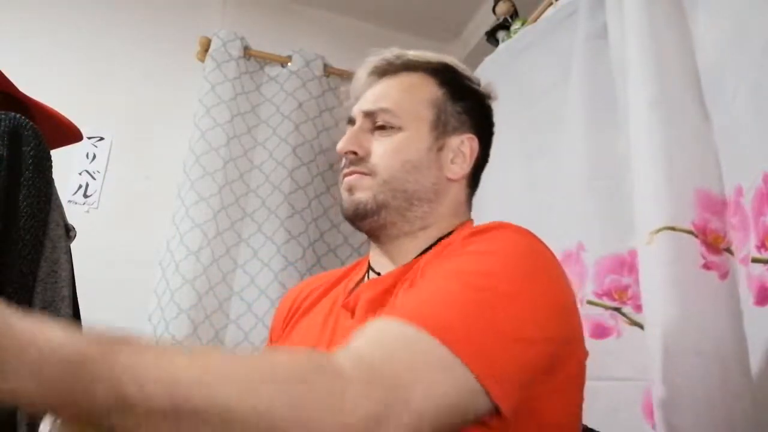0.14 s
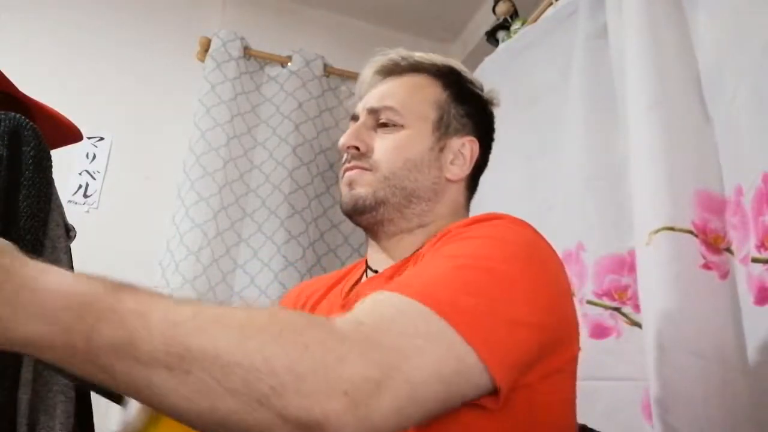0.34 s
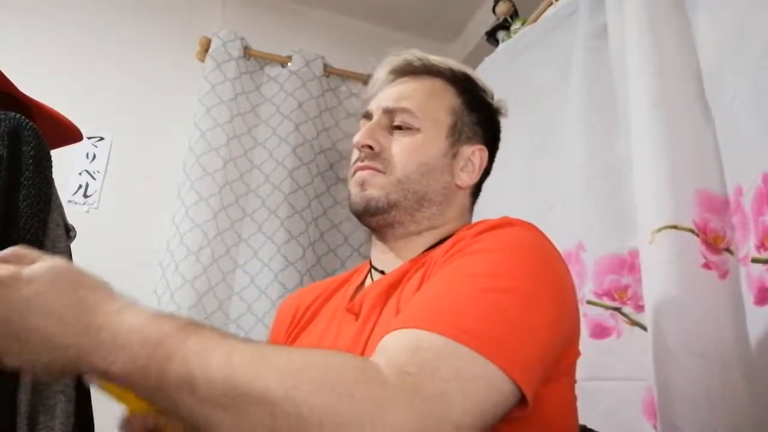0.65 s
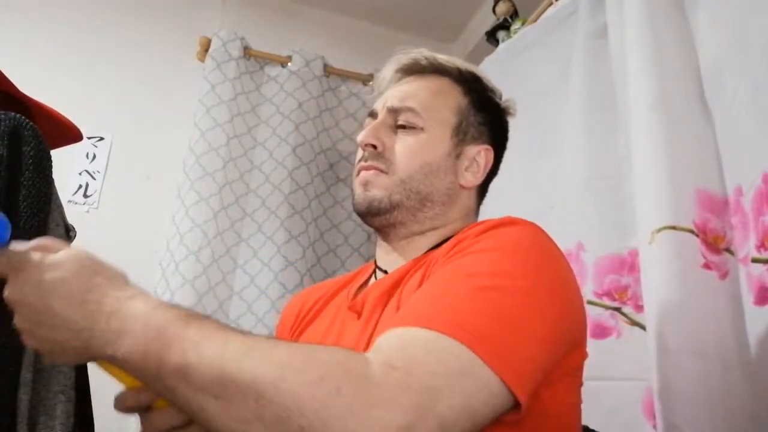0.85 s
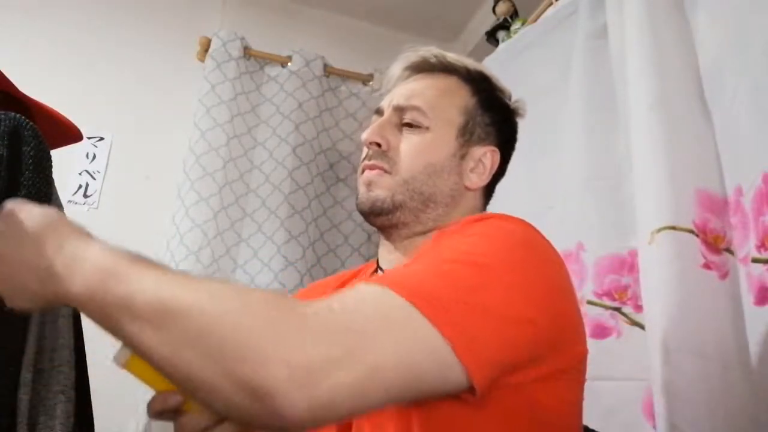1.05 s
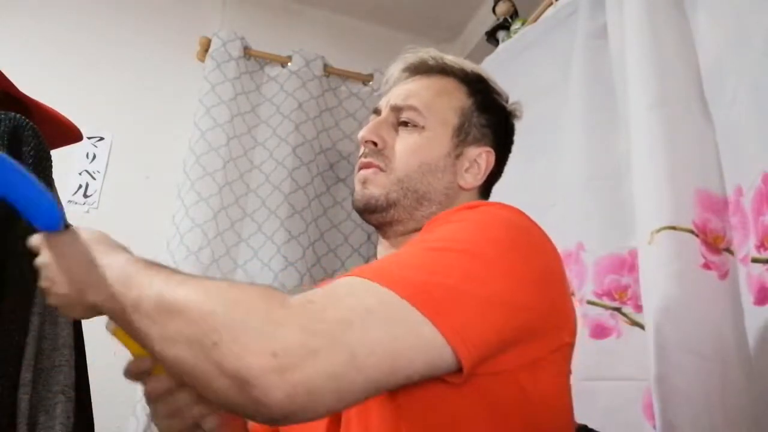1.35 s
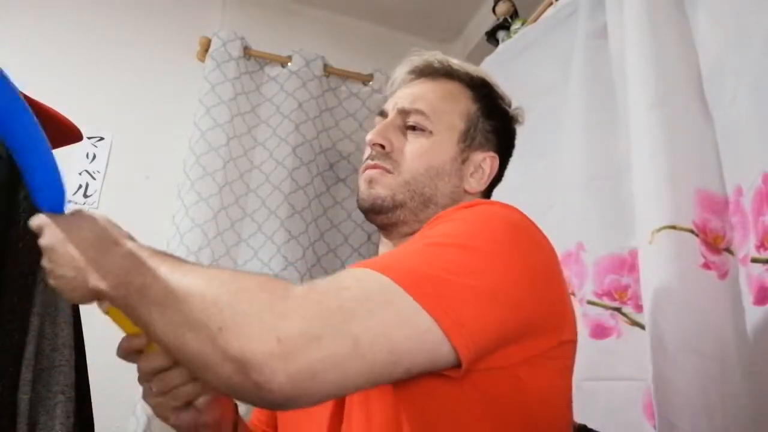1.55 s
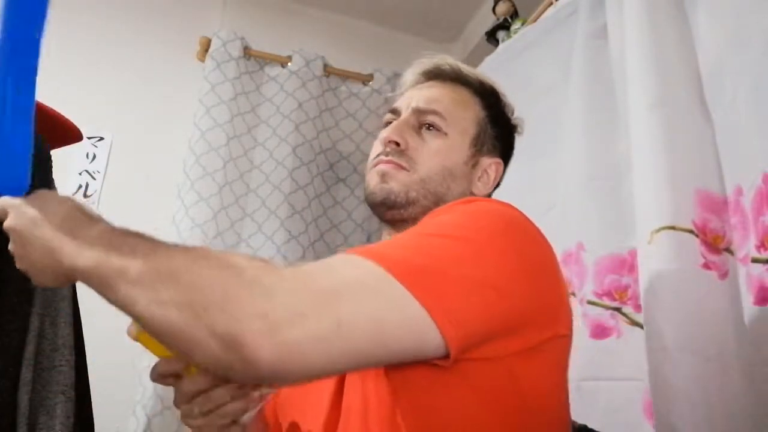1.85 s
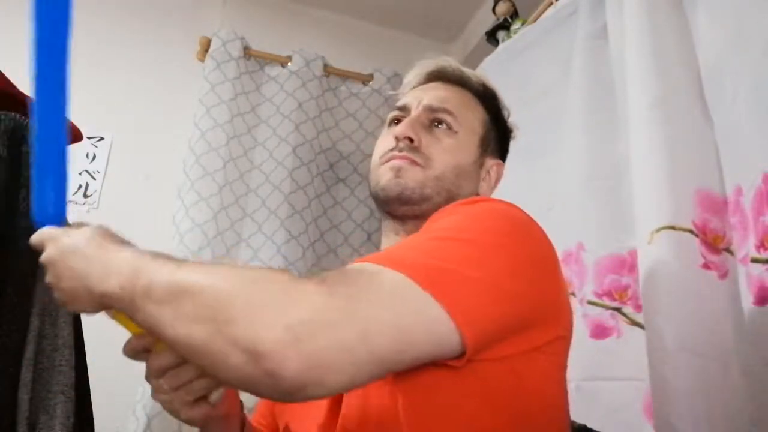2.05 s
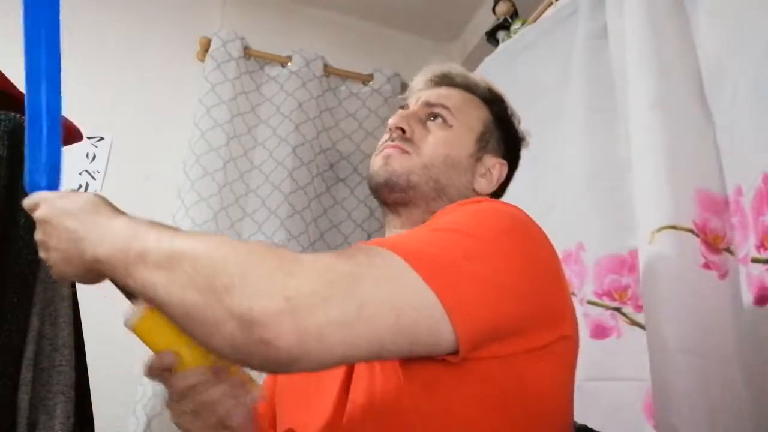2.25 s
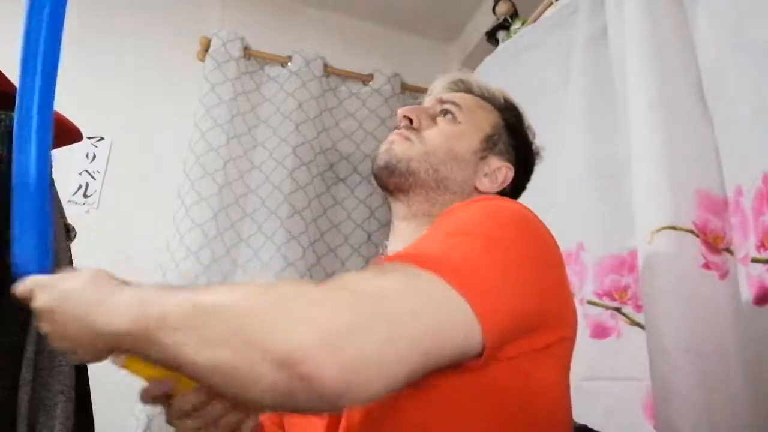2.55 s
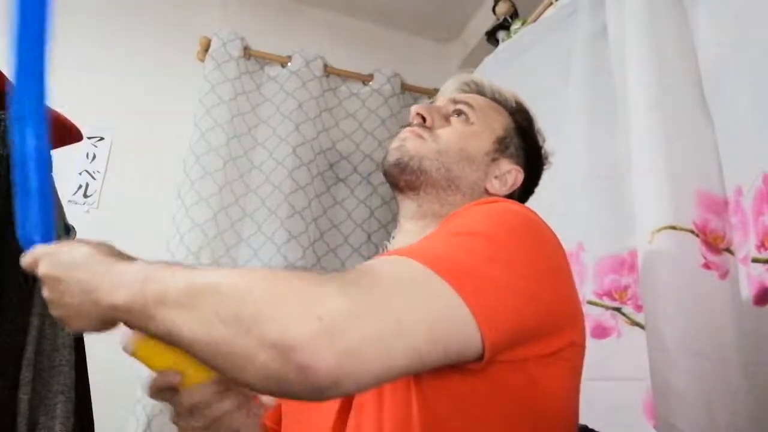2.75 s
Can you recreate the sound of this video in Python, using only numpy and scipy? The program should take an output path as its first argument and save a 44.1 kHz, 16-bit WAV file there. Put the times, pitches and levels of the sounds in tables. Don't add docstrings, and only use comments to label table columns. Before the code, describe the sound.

A plastic hand pump blows air into a long balloon in a small room, close to the microphone: a fluttering squeaky first push, strong hissing strokes, then fainter whistling ones, with hollow knocks between.

```python
import sys
import numpy as np
from scipy import signal
from scipy.io import wavfile
from scipy.ndimage import uniform_filter1d

SR = 44100
rng = np.random.default_rng(int(sys.argv[2]) if len(sys.argv) > 2 else 0)


def log_audio(samples):
    frames = np.atleast_2d(samples).T
    limited = np.clip(frames, -1, 1)
    pcm = np.round(limited * 32767).astype(np.int16)
    wavfile.write(sys.argv[1], SR, pcm)


def field_ratio(decibels):
    return 10 ** (np.asarray(decibels, dtype=float) / 20)


N = 127890
MONO_HZ = 300

# start_s, ease_off_s, end_s, flow_db, jet_hz
PUSHES = [
    (.212, .33, 0.36, -21.5, 6000),
    (.47, .72, 0.87, -22, 7250),
    (.985, 1.12, 1.201, -24.5, 7600),
    (1.275, 1.45, 1.569, -25.5, 9250),
    (1.65, 1.76, 1.863, -29.5, 5300),
    (1.945, 2.085, 2.136, -35, 5700),
    (2.265, 2.35, 2.43, -38.5, 5480),
    (2.51, 2.635, 2.693, -36, 6300),
    (2.805, 2.885, 3.02, -37, 5700),
]
# low_pitch_share, upper_pitch_share, whistle_db, bend_share
PUSH_VOICES = [(1, 1, -1, .05), (1, 1, -1, .05), (1, .98, -1, .05), (1, .98, -1, .05), (1, 1.025, -4, .07),
               (1.008, 1.005, 0, .075), (.995, .995, -1.5, .12), (.998, 1.005, -2, .06), (1, .98, -5, .09)]
# start_s, length_s, flow_db, jet_hz, whistle_db
PULLS = [(0.04, 0.037, -92, 1500, -10), (0.052, 0.13, -44.5, 1560, -3), (0.094, 0.36, -50, 2200, -14.5),
         (0.378, 0.106, -28.5, 5970, -3), (0.894, 0.16, -34, 7460, -1), (1.194, 0.11, -37, 8600, -11),
         (1.571, 0.21, -41.5, 5320, 3), (1.85, 0.088, -45, 5370, -19), (2.191, 0.09, -45.5, 5200, -0.5),
         (2.434, 0.22, -58.5, 5200, -5), (2.72, 0.091, -44.5, 5170, -4)]
# time_s, fill_share, fizz_db
FILL = [(.2, 0.39, -1.5), (.5, 0.12, 2), (.95, 0.37, 4), (1.3, 0.32, -1.5), (1.65, 0.7, 6.5),
        (1.95, 0.92, 3.5), (2.9, 0.95, -1.5)]
# freq_hz, level_db_per_hz
SLACK_NECK = [(180, -15.5), (300, -33), (731, -24), (1620, -15), (1970, -7), (3070, -7), (4720, -6),
              (11300, -6), (15500, -16.5)]
# freq_hz, level_db_per_hz
TIGHT_NECK = [(180, -77), (300, -33.5), (1200, -24), (1700, -10.5), (3000, -8), (3800, -13.5), (11700, -20),
              (15500, -30.5)]
# freq_hz, width_hz, level_db
BARREL = [(1600, 30, -2), (3000, 50, -2.5), (4480, 60, -9), (5950, 100, -10)]
# centre_s, pitch_hz, level_db, length_s
SQUEAKS = [
    (.222, 3002, -24.5, 0.015),
    (0.24, 3050, -26.5, .024),
    (.254, 3216, -27, .014),
    (.267, 3126, -23, 0.013),
    (0.285, 3270, -27, 0.016),
    (0.294, 3054, -27.5, .02),
    (0.307, 2896, -27, 0.0092),
    (0.324, 2583, -24, .022),
    (0.342, 2180, -20.5, 0.018),
]
# start_s, peak_db, thud_hz, click_db, click_hz
KNOCKS = [(0.056, -32, 420, 3.5, 1360), (0.208, -20, 156, -17, 513), (0.354, -45.5, 127, 11, 1500),
          (0.709, -22.5, 357.2, -27, 990), (.772, -25, 372, -21, 858), (0.801, -37.5, 300, 0, 1500),
          (.94, -40, 393, 0.5, 1458), (1.198, -41, 260.5, -23, 1030), (1.262, -33, 223, -33, 1000),
          (1.487, -40.5, 243, -31, 1010), (1.569, -56.5, 402, 21, 1500), (1.917, -33.5, 225, -39, 1020),
          (2.08, -31, 230, 10, 3740), (2.215, -16, 388, -14.5, 1730), (2.488, -31, 225, -33, 1020),
          (2.623, -25.5, 350, 6, 3660)]
# freq_ratio, level_db
THUD_MODES = [(1.022, 3.5), (0.652, -15.0), (1.387, -1.5), (2.115, -3.5)]
CLICK_MODES = [(1.008, 16.5), (0.77, 5.5), (0.494, -0.5), (1.26, 10.0)]
# start_s, level_db, pitch_hz, length_s
SHAKES = [
    (0.21, -38, 111, 0.11),
    (0.346, -43.5, 66.7, 0.21),
    (0.635, -46, 61, 0.089),
    (.7, -37, 171.6, 0.12),
    (0.726, -40.5, 61.4, 0.14),
    (0.933, -48, 94.4, 0.14),
    (1.581, -49.5, 99, 0.16),
    (2.041, -44.5, 101, 0.16),
    (2.214, -42.5, 59.3, 0.18),
    (2.603, -36, 90.3, 0.14),
]
# freq_hz, level_db_per_hz
ROOM_TONE = [(18, -39), (30, -8.5), (225, -13.5), (600, -19), (1500, -15), (2600, -19), (10200, -25),
             (15500, -39)]
# freq_hz, left_minus_right_db
LEAN_EARLY = [(60, -6), (130, -2), (290, 3.5), (640, -8), (1410, 1.5), (3100, 3), (6820, -10.5),
              (15000, -5)]
# freq_hz, left_minus_right_db
LEAN_LATE = [(60, -6), (130, -3), (290, 3.5), (640, -3.5), (1410, 6.5), (3100, -3), (6820, -4.5),
             (15000, -4.5)]
# freq_hz, width_share, level_db
FIXED_DIPS = [(2070, 0.15, 0), (4310, 0.072, -4), (8450, 0.028, -4), (13700, 0.024, -2)]


def push(start_s, ease_s, end_s, flow_db, jet_hz, rise_s, low, upper, whistle_db, bend):
    swell_db, fall_db, fall_bend = 3, -34, 1.385
    t = start_s + np.arange(0, end_s - start_s, 1 / SR)
    fill = curve(FILL, start_s)
    rise_s = rise_s * (1 + 0.13 * fill)
    rise = np.sin(np.pi / 2 * np.minimum((t - start_s) / rise_s, 1)) ** 2
    stroke = np.clip((t - start_s) / (ease_s - start_s), 0, 1)
    fall = np.clip((t - ease_s) / (end_s - ease_s), 0, 1)
    swell = np.sin(np.pi * stroke ** (0.72 + 2.9 * fill)) - 1
    flow = rise * field_ratio(flow_db + swell_db * swell + fall_db * fall ** fall_bend)
    pitch = 1 + bend * (((t - start_s) / (end_s - start_s)) ** 0.76 - .55)
    return start_s, jet(start_s, flow, jet_hz, 8.5, pitch, whistle_db, low, upper)


def jet(start_s, flow, jet_hz, jet_db, pitch, whistle_db, low=1, upper=1):
    below_share, above_share = 0.043, 0.19
    empty_db = -32
    fill = np.clip(curve(FILL, start_s), 0, 1)
    fizz_db = curve(FILL, start_s, axis=2)

    def colour_db(hz):
        neck = (1 - fill) * read(SLACK_NECK, hz) + fill * read(TIGHT_NECK, hz)
        peak = bump(hz, jet_hz, np.where(hz < jet_hz, below_share, above_share))
        fizz = bump(hz, 11500, 0.26)
        return neck + jet_db * (1 - .5 * fill) * peak + fizz_db * fizz

    hiss = noise(len(flow), colour_db, 1.5)
    pitch = pitch * (1 + .006 * wander(len(flow), 900))
    tones = np.zeros(len(flow))
    for (hz, width_hz, db), share in zip(BARREL, [low, upper, upper, upper]):
        tone_hz = hz * share * pitch
        tone = resonate(rng.standard_normal(len(flow)), tone_hz, width_hz)
        tones += field_ratio(db) * evened(resonate(tone, tone_hz, 3 * width_hz))
    ringing = flow.max() * (flow / flow.max()) ** 0.84
    whistle = field_ratio(whistle_db + empty_db * (1 - fill)) * ringing * tones
    flicker_db = 1 * wander(len(flow), 300)
    return field_ratio(flicker_db) * (flow * hiss + whistle)


def pull(start_s, length_s, flow_db, jet_hz, whistle_db):
    u = np.arange(0, length_s, 1 / SR) / length_s
    peak = 0.16 + 0.11 * curve(FILL, start_s) ** 2
    away = np.where(u < peak, 1 - u / peak, (u - peak) / (1 - peak))
    flow = field_ratio(flow_db - 18.5 * away ** 0.79)
    return start_s, jet(start_s, flow, jet_hz, 16.5, 0.98, whistle_db)


def squeak(centre_s, hz, db, length_s):
    u = np.arange(0, length_s, 1 / SR) / length_s
    turns = np.cumsum(hz * (1 + 0.018 * wander(len(u), 150))) / SR
    return centre_s - length_s / 2, field_ratio(db + 4) * np.sin(np.pi * u) * np.sin(2 * np.pi * turns)


def knock(start_s, peak_db, thud_hz, click_db, click_hz):
    thud_cycles, click_cycles = 7, 13
    thud_rise_s, click_rise_s, buzz_rise_s = .0017, .0008, .004
    buzz_db, buzz_t60_s = -16, 0.14
    rattle_db, bounce_s, bounce_db, lag_s = -13, 0.014, -11, 0.0032
    t = np.arange(0, .12, 1 / SR)

    def ring(hz, db, cycles):
        return field_ratio(db - 60 * t * hz / cycles) * np.sin(2 * np.pi * hz * t)

    thud = sum(ring(thud_hz * k, db, thud_cycles * k ** 0.61) for k, db in THUD_MODES)
    click = sum(ring(click_hz * k, db + click_db, click_cycles) for k, db in CLICK_MODES)
    buzz = resonate(rng.standard_normal(len(t)), thud_hz, thud_hz)
    buzz += 0.42 * resonate(rng.standard_normal(len(t)), 1.63 * thud_hz, thud_hz)
    x = thud * (1 - np.exp(-t / thud_rise_s)) + click * (1 - np.exp(-t / click_rise_s))
    x += field_ratio(buzz_db - 60 * t / buzz_t60_s) * (1 - np.exp(-t / buzz_rise_s)) * evened(buzz)

    taps = np.zeros(1500)
    taps[rng.integers(100, 1500, 6)] = field_ratio(rattle_db) * rng.uniform(-0.6, 1, 6)
    taps *= field_ratio(-12 * np.arange(1500) / 1500)
    taps[[0, round(bounce_s * SR)]] = 1, field_ratio(bounce_db)
    return start_s + lag_s, -field_ratio(peak_db) * signal.fftconvolve(x, taps)


def shake(start_s, db, hz, length_s):
    u = np.arange(0, length_s, 1 / SR) / length_s
    turns = hz * length_s * u * (1.2 - 0.242 * u) + rng.random() + 0.15 * wander(len(u), 600)
    return start_s, field_ratio(db - 3.0) * np.sin(np.pi * u ** 0.556) ** 2 * np.sin(2 * np.pi * turns)


def room(x):
    echo_db, echo_s, tail_db, tail_t60_s, drift_rad = 3, .014, -1.5, 0.19, 1.83
    length = SR // 3
    taps = np.zeros((2, length))
    at = np.arange(400, length - 20, 20) + rng.integers(0, 20, (2, (length - 401) // 20))
    np.put_along_axis(taps, at, rng.choice([-1., 1.], at.shape), 1)
    taps *= field_ratio(-60 * np.arange(length) / SR / tail_t60_s)
    taps *= field_ratio(tail_db) / np.linalg.norm(taps[0])

    place, size = rng.uniform(.06, 1, (2, 8)), rng.uniform(-1.375, 1, (2, 8))
    size *= field_ratio(echo_db) / np.linalg.norm(size, axis=1, keepdims=True)
    np.put_along_axis(taps, (place * echo_s * SR).astype(int), size, 1)

    high = signal.sosfilt(signal.butter(2, MONO_HZ, "high", fs=SR, output="sos"), x)
    wet = signal.fftconvolve(high[None], taps, axes=1)[:, :N]
    z = signal.stft(wet, nperseg=512, noverlap=384)[2]
    drift = rng.standard_normal(z.T.shape).T
    drift = evened(uniform_filter1d(uniform_filter1d(drift, 6, 2), 3, 1))
    treble = np.minimum(np.arange(257) / 60, 1)[:, None]
    z = z * np.exp(1j * drift_rad * drift * treble)
    return x + signal.istft(z, nperseg=512, noverlap=384)[1][:, :N]


def hum():
    both, left, right = (noise(N, lambda hz: read(ROOM_TONE, hz), 4.6) for _ in range(3))
    low = signal.butter(2, MONO_HZ, fs=SR, output="sos")
    apart = np.array([left, right])
    opening = field_ratio(-8.5 * (np.arange(N) < .052 * SR))
    return field_ratio(-49.5) * (signal.sosfiltfilt(low, both) + opening * (apart - signal.sosfiltfilt(low, apart)))


def noise(length, colour_db, patch_db):
    frames, hz = length // 128 + 6, np.fft.rfftfreq(512, 1 / SR)
    a, b, patches = rng.standard_normal((frames, 257, 3)).T
    patches = evened(uniform_filter1d(uniform_filter1d(patches, 5, 0), 12, 1))
    z = (a + 1j * b) * field_ratio(colour_db(hz)[:, None] + patch_db * patches)
    return evened(signal.istft(z, nperseg=512, noverlap=384)[1][:length])


def resonate(x, hz, width_hz):
    turn = np.exp(2j * np.pi * np.cumsum(hz * np.ones(len(x))) / SR)
    r = np.exp(-np.pi * width_hz / SR)
    return 2 * (turn * signal.lfilter([1 - r], [1, -r], x / turn + 1e-18)).real


def wander(length, smooth):
    return evened(uniform_filter1d(rng.standard_normal(length), smooth))


def evened(x):
    return x / np.sqrt(np.mean(np.abs(x) ** 2) + 1e-20)


def bump(hz, centre_hz, width):
    return np.exp(-.5 * (np.log((hz + 1) / centre_hz) / width) ** 2)


def read(points, hz):
    f, value = np.transpose(points)
    return np.interp(np.log(hz + 1), np.log(f + 1), value)


def curve(points, t, axis=1):
    rows = np.array(points)
    return np.interp(t, rows[:, 0], rows[:, axis])


def add(mix, start_s, sound):
    part = mix[round(start_s * SR):][:len(sound)]
    part += sound[:len(part)]


def scene():
    pump, hits = np.zeros(N), np.zeros(N)
    for k, row in enumerate(PUSHES):
        rise_s = 0.032 if k else 0.002
        add(pump, *push(*row, rise_s, *PUSH_VOICES[k]))
    for row in PULLS:
        add(pump, *pull(*row))
    for row in SQUEAKS:
        add(hits, *squeak(*row))
    for row in KNOCKS:
        add(hits, *knock(*row))
    for row in SHAKES:
        add(pump, *shake(*row))
    echoed = field_ratio(-10)
    return room(pump + echoed * hits) + (1 - echoed) * hits + hum()


def low_pass(x):
    return signal.sosfilt(signal.butter(12, 16250, fs=SR, output="sos"), x)


def record(dry):
    lag_early_s, lag_late_s, rumble_hz, top_hz = 0.0003555, 0.0002, 44, 15250
    twist_hz, twist_rad, untwist_hz, untwist_rad = 653, -1.3, 1500, 1
    hz, t, z = signal.stft(dry, SR, nperseg=1024, noverlap=768)
    late, f = np.clip(curve(FILL, t), 0, 1), hz[:, None]

    lean_db = (1 - late) * read(LEAN_EARLY, f) + late * read(LEAN_LATE, f)
    lean_db = lean_db * np.minimum(f / MONO_HZ, 1)
    lag_s = (1 - late) * lag_early_s + late * lag_late_s
    phase = -2 * np.pi * f * lag_s
    phase = phase + twist_rad * bump(f, twist_hz, 0.17) + untwist_rad * bump(f, untwist_hz, 0.27)
    port_db = 11 * (1 - 0.2 * late ** 2) * bump(f, 11570, 0.019)
    left = field_ratio(lean_db / 2 + port_db) * np.exp(1j * phase)
    right = field_ratio(-lean_db / 2)

    shared_db = -6 * bump(f, twist_hz, 0.24)
    shared_db = shared_db + sum(db * bump(f, at_hz, wide) for at_hz, wide, db in FIXED_DIPS)
    band = (f < top_hz) / np.sqrt(1 + (rumble_hz / (f + 1)) ** 2)
    z = z * field_ratio(shared_db) * band * np.array([left, right])
    mix = signal.istft(z, SR, nperseg=1024, noverlap=768)[1][:, :N]
    return low_pass(mix)


dry = scene()
out = record(dry)
log_audio(out)
```